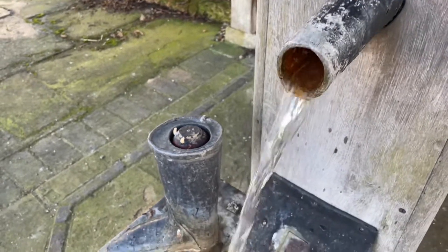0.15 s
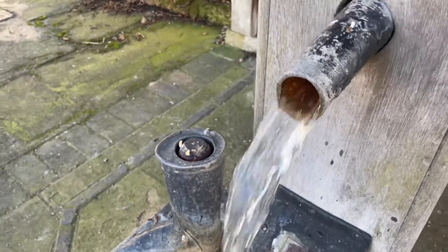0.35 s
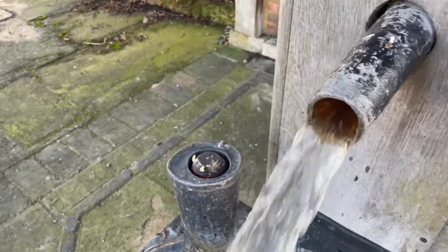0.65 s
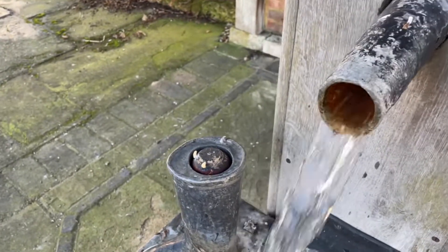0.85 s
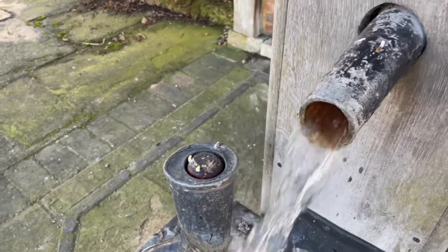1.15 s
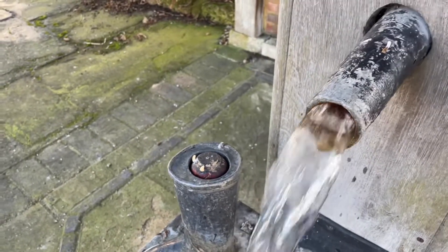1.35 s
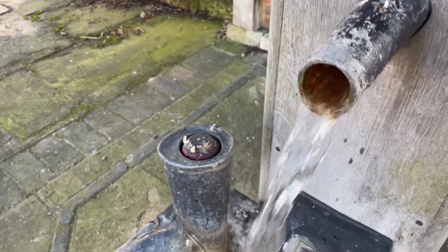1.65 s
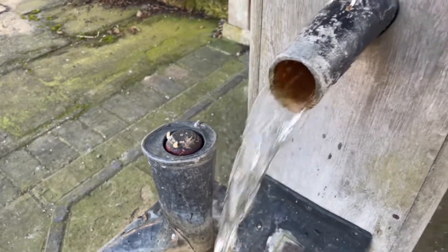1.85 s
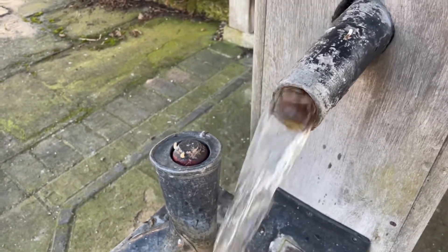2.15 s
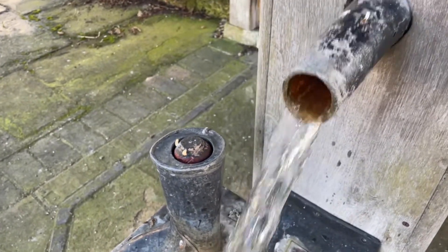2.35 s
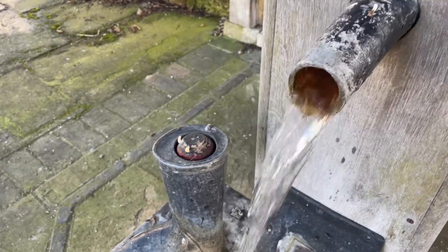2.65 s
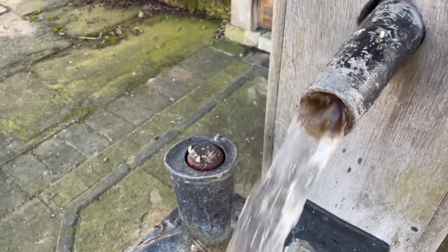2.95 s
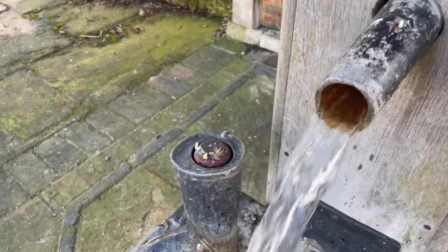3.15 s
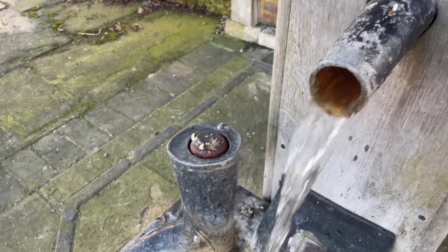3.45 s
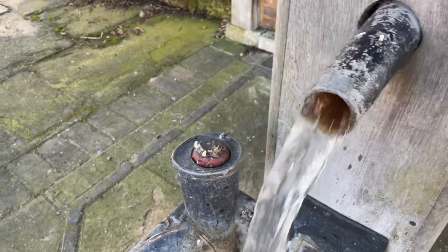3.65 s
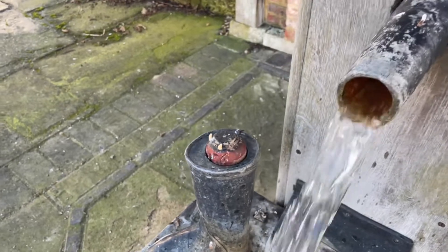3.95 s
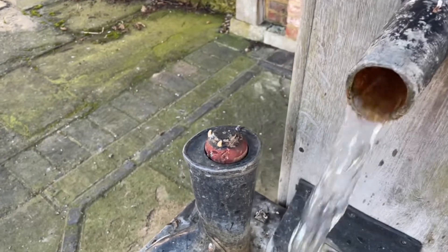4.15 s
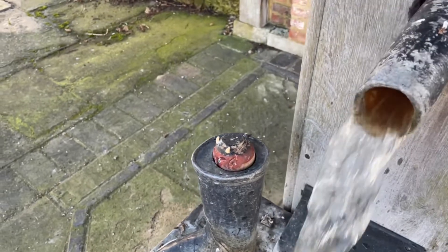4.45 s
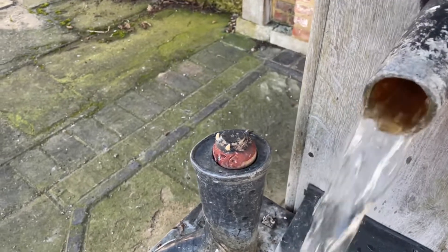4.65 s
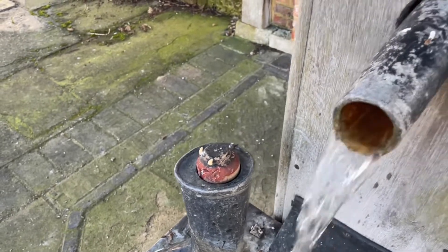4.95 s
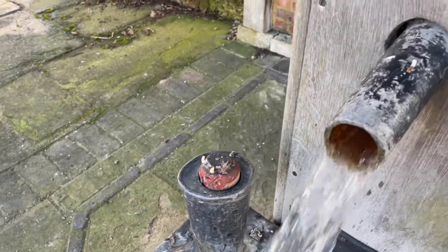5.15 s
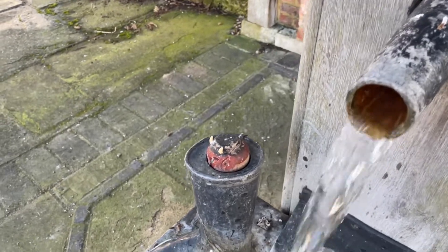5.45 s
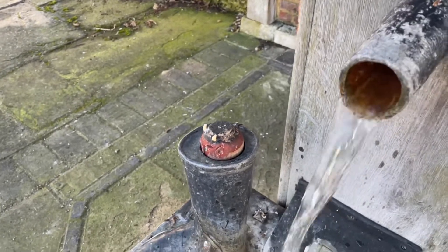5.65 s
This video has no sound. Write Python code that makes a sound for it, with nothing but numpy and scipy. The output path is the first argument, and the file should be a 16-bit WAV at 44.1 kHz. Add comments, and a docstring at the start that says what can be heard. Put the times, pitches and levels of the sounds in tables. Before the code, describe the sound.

Close to the microphone outdoors, an iron pump spout gushes into a trough. About every 0.75 seconds the fizzing jet swells and a heavy slug lands with ringing bubbles and hollow glugs. Between strokes come smaller splashes, plops and stray drops slapping, over a low churn, with very faint thin squeals and a slight short echo off paving.

```python
"""An iron spout gushes into a trough, close to the microphone, as a hand pump is worked outdoors.
Each stroke swells the jet, a fizz of droplets over hiss, and throws a heavy slug: a burst of ringing bubbles
with glugging pockets of air. Between strokes smaller slugs fall, cavities plop open, and the jet breaks and
lands again. Stray drops slap as short spatters, the pool churns low, and the pump squeals thinly."""
import sys
import numpy as np
from scipy import signal
from scipy.fft import rfft, irfft
from scipy.io import wavfile
from scipy.ndimage import uniform_filter1d

SR = 44100
rng = np.random.default_rng(int(sys.argv[2]) if len(sys.argv) > 2 else 0)


def to_wav(s):
    """Save 16-bit WAV."""
    ch = np.atleast_2d(s).T  # columns
    pcm = np.round(np.clip(ch, -1, 1) * 32767)  # PCM
    wavfile.write(sys.argv[1], SR, pcm.astype(np.int16))


N = 255339
TIME = np.arange(N) / SR

# pump strokes, at the moment their main slug lands: start_s, spray_db, spray_ebb_s, splash_length_s,
# splash_db, bubble_pitch_hz, air_pocket_db, deep_glug_db
PUMP_STROKES = [(0.0, -48, 0.45, 0.032, -24, 315, -32, -21.5),
                (0.749, -39.5, 0.15, 0.069, -25.5, 448, -29, -24),
                (1.574, -45, .16, 0.08, -26.5, 406, -21.5, -20.5),
                (2.381, -50.5, 0.43, 0.06, -28, 365, -19.5, -27),
                (3.178, -42.5, 0.16, 0.054, -25, 440, -38, -20),
                (3.929, -43.5, 0.23, .06, -26, 500, -53, -54),
                (4.679, -47, 0.6, 0.063, -26.5, 390, -24, -62),
                (5.412, -42.5, 0.09, 0.072, -25, 444, -28, -24)]
# tone of a dull smack of water: frequency_hz, gain_db
SMACK_SPECTRUM = [(300, -2.5), (1100, -7), (1800, 2), (3000, -4), (7000, -20)]


def gain_of(db):
    """Decibels to amplitude."""
    return 10 ** (np.asarray(db) / 20)


def evened(x):
    """Scales to rms 1."""
    return x / np.sqrt(np.mean(x ** 2) + 1e-20)


def add(mix, s, sound):
    """Lays a sound into the mix at time s."""
    start = max(round(s * SR), 0)
    part = mix[start:][:len(sound)]
    part += sound[:len(part)]


def follow(curve):
    """A curve of (time, value) points at every sample."""
    return np.interp(TIME, *np.transpose(curve))


def coloured(x, spectrum):
    """Filters a sound through a smooth gain curve, then scales it to rms 1."""
    hz, db = np.transpose(spectrum)
    bins_hz = np.fft.rfftfreq(len(x), 1 / SR)
    shape_db = np.interp(np.log(bins_hz + 1), np.log(hz), db)
    return evened(irfft(rfft(x) * gain_of(shape_db), len(x)))


def wander(hz):
    """Slow chance of rms 1 that changes about hz times a second."""
    knots = np.random.default_rng(rng.integers(1 << 30)).standard_normal(8192)
    return evened(np.interp(TIME * hz, np.arange(len(knots)), knots))


def scattered(x, t60):
    """Hard surfaces scatter a sound into a short, sparse tail of about the same energy."""
    t = np.arange(0, t60, 1 / SR)
    present = rng.random(SR)[:len(t)] < 3000 / SR  # about 3000 echoes a second
    taps = rng.standard_normal(SR)[:len(t)] * present * gain_of(-60 * t / t60)
    return signal.oaconvolve(x, taps / np.linalg.norm(taps))[:N]


def bubble(t, hz, cycles, glide):
    """A bubble rings for a few cycles, its pitch sliding as it nears the surface."""
    turns = hz * np.maximum(t, 0)
    age = turns / cycles
    phase = 2 * np.pi * turns * (1 + glide * np.minimum(age, 6) / 2)
    return np.sin(phase) * np.exp(-age) * (1 - np.exp(-turns / 0.1))


def swarm(low_hz, high_hz, per_s, cycles, spread_db, glide, count, patchy_db=0):
    """Bubbles of many drifting sizes born at random; a few are much louder, and each size has its own echoes."""
    out = np.zeros(N)
    for hz in np.geomspace(low_hz, high_hz, count):
        loudness_db = spread_db * np.minimum(rng.exponential(1, 4000), 3.5)
        sizes = gain_of(loudness_db) * rng.choice([-1, 1], 4000)
        places = rng.integers(0, N, len(sizes))
        born = int(per_s * N / SR / count)
        births = np.bincount(places[:born], sizes[:born], N)
        ring = bubble(np.arange(0, 6 * cycles / hz, 1 / SR), hz, cycles, glide)
        direct = signal.oaconvolve(births, ring)[:N]
        stream = direct + .8 * scattered(direct, t60=0.026)
        if hz < 10500:
            # reading at an uneven speed makes the pitch drift
            drift = np.cumsum(1 + .07 * wander(14))
            stream = np.interp(drift % N, np.arange(N), stream)
        out += np.sqrt(hz) * evened(stream * gain_of(patchy_db * wander(50)))
    return evened(out)


def trough(flow_db):
    """The jet stirs the pool: a deep, lumpy churn and a gurgle of middling bubbles."""
    # tone of the deep churn: frequency_hz, gain_db
    churn_spectrum = [(20, -48), (35, -15), (55, -4), (80, -1.5), (125, 0), (200, -7), (450, -18),
                      (1000, -34), (3000, -75)]
    # tone of the middling bubbles: frequency_hz, gain_db
    gurgle_spectrum = [(120, -25), (270, 10), (500, -8.5), (780, 4), (1100, -18), (2200, -49), (6000, -53)]
    # churn in the pool, before its lumps: time_s, level_db
    churn_level = [(0, -38), (.6, -45), (.95, -37), (1.42, -53), (1.8, -34.5), (2.35, -35), (2.75, -32.5),
                   (2.96, -37), (3.1, -34), (3.5, -29), (3.72, -35), (4.2, -32.5), (4.55, -40),
                   (4.85, -38.5), (5.0, -35.5), (5.33, -44), (5.55, -37.5), (5.79, -38)]
    gurgle_db, gurgle_follows = -27, 0.34  # the gurgle follows only this share of the jet's dB

    lumps_db = 3 * wander(32)
    deep = swarm(45, 420, per_s=260, cycles=1.1, spread_db=1.8, glide=0, count=10)
    churn = coloured(deep, churn_spectrum) * gain_of(follow(churn_level) + lumps_db)
    middling = swarm(240.3, 1504, per_s=420, cycles=4.3, spread_db=1.5, glide=0.019, count=20)
    gurgle = coloured(middling, gurgle_spectrum) * gain_of(gurgle_db + gurgle_follows * flow_db)
    return churn + gurgle


def squeal():
    """A thin wavering whistle from the pump, each squeal swelling and fading in a half-sine arch."""
    # squeals of the pump: start_s, length_s, peak_db
    squeals = [(.435, 0.065, -56), (.77, .07, -51), (3.21, 0.098, -55), (5.11, .07, -63),
               (5.413, 0.12, -49)]
    level = np.zeros(N)
    for s, length, db in squeals:
        level += gain_of(db) * np.sin(np.pi * np.clip((TIME - s) / length, 0, 1))
    pitch = 14870 + 110 * wander(600)
    return level * np.sin(2 * np.pi * np.cumsum(pitch) / SR)


def spatter(low_hz, high_hz, fade_s, count):
    """A tight cluster of droplets, each with its own pitch, thinning and fading."""
    t = np.arange(0, .05, 1 / SR)
    pitch = np.geomspace(low_hz, high_hz, count) * np.exp(.1 * rng.standard_normal(count))
    born = 3 * fade_s * ((rng.permutation(count) + rng.random(count)) / count) ** 1.5
    sizes = np.sqrt(pitch) * np.exp(-.7 * born / fade_s) * rng.choice([-1, 1], count)
    rings = bubble(t - born[:, None], pitch[:, None], 1.5, glide=0)
    return sizes * np.sqrt(pitch) @ rings


def burst(spectrum, fade_s, count):
    """A spatter with a given tone, as strong as a unit noise with that fade, so louder the longer it lasts."""
    sound = coloured(spatter(spectrum[0][0], spectrum[-1][0], fade_s, count), spectrum)
    onset = 1 - np.exp(-TIME[:len(sound)] / .0005)
    return sound * onset * np.sqrt(fade_s * SR / 2 / len(sound))


def slap(db, smack_db):
    """A drop bursts in a sharp spatter, with a duller smack under it."""
    # tone of the sharp spatter: frequency_hz, gain_db
    slap_spectrum = [(200, -25), (1200, -7), (2500, -28), (5000, 2.5), (9000, 3), (16000, -1)]
    sharp = burst(slap_spectrum, fade_s=0.0041, count=140)
    smack = gain_of(smack_db) * burst(SMACK_SPECTRUM, fade_s=.0062, count=40)
    return gain_of(db - 6.8) * (sharp + smack)


def add_stray_drops(water):
    """Stray drops slap on iron and stone, each bursting on impact."""
    # drops: start_s, nominal level_db, smack_db (relative to the sharp spatter)
    stray_drops = [(.009, -26, -13), (0.208, -25, -10), (0.263, -29.5, -3), (0.329, -25, -17),
                   (0.341, -23.5, 3), (0.6584, -22.5, 4), (.673, -26, -2), (.691, -26, -5), (.998, -28, 4),
                   (1.068, -28.5, 7), (1.4326, -30.5, 4.5), (1.51, -25.5, 1), (1.642, -30, -5),
                   (1.668, -24, 0), (1.745, -25, -18), (1.79, -29, 0), (1.8255, -34, 14),
                   (1.879, -25.5, -0.5), (2.132, -30.5, -2), (2.24, -27, -10), (2.344, -32.5, 8.5),
                   (2.362, -32, -9), (2.556, -21.5, -14), (2.572, -27.5, 1.5), (2.665, -26.5, -0.5),
                   (2.874, -32, -7), (3.282, -26, 0), (3.383, -28, 4.5), (3.475, -28, 0), (3.785, -29.5, 0),
                   (3.825, -32, 3), (3.997, -29, -5), (4.236, -29, 6), (4.2683, -25, -3), (4.348, -27.5, 0),
                   (4.444, -35.5, 11.5), (4.645, -24.5, -1), (4.916, -29, 2), (5.067, -24, -1),
                   (5.401, -20, -1), (5.419, -21.5, 5), (5.572, -27.5, -4), (5.7413, -24, -5)]
    for s, db, smack_db in stray_drops:
        add(water, s, slap(db, smack_db))


def plink(db, hz):
    """A small bubble rings up and away, its pitch climbing as it nears the surface."""
    age = np.arange(0, 8, 1 / (SR * PLINK_SWELL_S))
    pitch = hz * (1 + 0.023 * (age - 1))  # share climbed per swell time
    level = gain_of(db) * (age * np.exp(1 - age)) ** 3.3
    return level * np.sin(2 * np.pi * (np.cumsum(pitch) / SR + rng.random()))


PLINK_SWELL_S = 0.0025


def glug(db, hz, swell):
    """A big pocket of air swells into ringing and sinks in pitch as it widens."""
    age = np.arange(0, 8, 1 / (SR * swell))
    pitch = hz * (0.874 + 0.16 * np.exp(-age / 2.37))
    level = gain_of(db) * age ** 2.85 * np.exp(2.97 * (1 - age))
    return level * np.sin(2 * np.pi * (np.cumsum(pitch) / SR + rng.random()))


def ringing_bubbles():
    """Single bubbles that stand out of the water; the larger a gulp is, the slower it swells."""
    # large air bubbles that ring out from the splashes: loudest_s, pitch_hz, peak_db
    gulps = [(.01, 245, -23), (.034, 205, -23), (.147, 151, -34), (0.44, 300, -18), (0.476, 230, -18.5),
             (.488, 129, -22.5), (.764, 370, -18.5), (0.775, 630, -20), (0.821, 250, -18), (.994, 482, -18),
             (1.083, 890, -15), (1.248, 477, -16.5), (1.587, 370, -17.5), (1.624, 450, -20),
             (1.962, 916, -18), (1.975, 216, -24), (2.003, 315, -21.5), (2.124, 780, -24.5),
             (2.429, 262, -16), (2.83, 670, -19), (2.841, 320, -22.5), (3.19, 350, -19.5),
             (3.213, 543, -17), (3.545, 854, -18), (3.641, 546, -25.5), (3.656, 252, -20), (3.97, 324, -22),
             (4.705, 330, -27), (4.424, 328, -22), (4.449, 900, -18), (5.154, 900, -18),
             (5.459, 460, -16.5), (5.471, 269, -24), (5.634, 470, -18.5), (5.666, 400, -24)]
    # small bubbles that plink above the spray: loudest_s, pitch_hz, peak_db
    plinks = [(.053, 3010, -28.5), (.154, 2310, -31.5), (.343, 1240, -26), (0.551, 1150, -31.5),
              (0.661, 1680, -30), (.761, 2530, -25.5), (1.676, 1190, -27), (1.747, 2980, -34),
              (1.834, 2380, -32), (2.574, 1960, -28), (3.147, 2540, -27), (3.384, 1460, -31),
              (3.427, 1750, -28.5), (3.661, 4070, -35), (3.788, 3710, -29), (3.83, 2010, -30.5),
              (4.205, 1710, -31.5), (4.6, 1600, -25.5), (4.895, 1712, -31), (5.152, 2540, -26),
              (5.657, 1660, -25.5), (5.745, 2000, -28.5)]
    out = np.zeros(N)
    for s, hz, db in gulps:
        swell = 0.00496 * np.sqrt(400 / hz)  # seconds; 0.00496 at 400 Hz
        add(out, s - swell, glug(db, hz, swell))
    for s, hz, db in plinks:
        add(out, s - PLINK_SWELL_S, plink(db, hz))
    return out


def splash(length, db, hz, count=64):
    """A slug of water drags down a burst of bubbles; larger ones dominate late, and a few straggle."""
    pitch = np.geomspace(140, 3200, count)
    octaves = np.log2(pitch / hz)
    # golden-ratio steps spread the sizes evenly over the splash
    order = (np.arange(count) * (np.sqrt(5) - 1) / 2 + rng.random() + .15 * rng.random(count)) % 1
    straggle = order ** 6
    born = length * (order + 0.5 * straggle) + .4 / pitch
    colour_db = -np.where(octaves > 0, 5.6, -4.8) * octaves
    chance_db = 2.56 * rng.standard_normal(count)
    size_db = colour_db + chance_db - 3 * order - 6 * straggle - 2.85 * order * octaves
    t = np.arange(0, 1.6 * length + .06, 1 / SR)
    cycles = 3.2 * (pitch[:, None] / 500) ** .3  # small bubbles ring for more cycles
    rings = bubble(t - born[:, None], pitch[:, None], cycles, glide=-0.041)
    bubbles = (gain_of(size_db) * rng.choice([-1, 1], count)) @ rings
    return gain_of(db) * bubbles / np.sqrt(np.sum(bubbles ** 2) / (SR * (length + 0.0068)))


def frothy(length, db, hz, count=5):
    """A heavy splash whips up a longer froth of smaller bubbles in its wake and a few late plinks."""
    froth_delay_s, froth_hz, froth_db, froth_lasts = .009, 880, -16, 1.2  # dB over the splash, times its length
    after_db, after_s = -19.5, 0.094  # late plinks: peak dB over the splash, how long they keep coming
    out = np.zeros(SR // 2)
    add(out, 0, splash(length, db, hz))
    add(out, froth_delay_s, splash(froth_lasts * length, db + froth_db, froth_hz))
    for late, size in rng.random((count, 2)):
        add(out, length + late * after_s, plink(db + after_db - 6 * late, 750 * 2.82 ** size))
    return out


def plop(db, hz, halving, count=24):
    """An air cavity tears open in a ragged run of ever larger bubbles; its rim spits droplets."""
    tear_s = 0.00911  # how long a cavity takes to tear open
    t = np.arange(0, .06, 1 / SR)
    born = tear_s * ((np.arange(count) + rng.random(count)) / count) ** 1.6
    pitch = hz / (1 + born / halving) * np.exp(.25 * rng.standard_normal(count))
    rings = bubble(t - born[:, None], pitch[:, None], 2.8, glide=-.02)
    sizes = np.exp(-born / 0.035) * rng.choice([-1, 1], count)
    run = .24 * evened(sizes @ rings)
    add(run, 0, gain_of(-3.5) * burst(SMACK_SPECTRUM, fade_s=0.0036, count=56))
    return gain_of(db) * run * (1 - np.exp(-t / .0013))


def plunges():
    """Every slug splashes and traps air; every cavity plops, fills with a splash and glugs."""
    # smaller slugs between the strokes: start_s, splash_length_s, splash_db, bubble_pitch_hz,
    # air_pocket_peak_db, air_pocket_swell_s
    small_slugs = [(0.133, 0.021, -29, 187, -42, 0.0078), (0.219, 0.046, -33.5, 373, -32.5, 0.01),
                   (0.873, 0.084, -35, 497, -37, 0.01), (0.98, 0.062, -26.5, 437, -35, 0.018),
                   (1.793, 0.062, -27.5, 470, -18, 0.0039), (2.34, .042, -28.5, 440, -24.5, 0.017),
                   (2.629, 0.036, -30.5, 494, -21, 0.0082), (2.671, 0.032, -30, 593, -49, 0.015),
                   (2.811, 0.022, -30, 614, -42, 0.008), (1.764, .02, -35, 322, -24, 0.0053),
                   (4.96, .012, -35, 266, -37, 0.011), (5.675, .04, -37, 417, -38, .007),
                   (3.256, 0.095, -36.5, 298, -33, 0.0076), (3.385, 0.063, -31.5, 437, -17.5, 0.0043),
                   (3.632, 0.037, -27.5, 347, -23, 0.0098), (4.059, 0.057, -48, 340, -29, 0.009),
                   (4.14, 0.012, -31.5, 496, -19, 0.0096), (4.202, 0.038, -30, 370, -28, 0.013),
                   (4.854, 0.017, -31, 459, -18.5, 0.0059), (4.886, 0.052, -29, 446, -21, 0.0032),
                   (5.113, 0.035, -24.5, 566, -37, 0.0015), (5.612, 0.028, -27.5, 488, -21, 0.0063)]
    # cavities bursting open and filling in: start_s, plop_db, starting_pitch_hz, pitch_halving_s,
    # splash_length_s, splash_db, splash_pitch_hz, deep_glug_db
    cavities = [(0.432, -19, 2650, 0.0019, 0.053, -25.5, 654, -24),
                (1.077, -17.5, 3150, 0.0023, 0.028, -29.5, 760, -23.5),
                (1.241, -19.5, 2840, 0.0048, 0.03, -27, 543, -47),
                (1.576, -21.5, 1490, 0.0017, 0.017, -32, 450, -37),
                (1.955, -18.5, 2360, 0.0025, 0.034, -25.5, 516, -17),
                (2.12, -27, 1014, 0.0043, 0.027, -64, 725, -47),
                (2.823, -18, 3030, 0.0041, 0.036, -26.5, 714, -28),
                (3.422, -31, 1880, 0.0048, 0.022, -28, 540, -30),
                (3.538, -21, 1900, 0.0021, .028, -26, 720, -27),
                (4.413, -18.5, 1470, 0.0021, 0.051, -25.5, 550, -18.5),
                (5.148, -20, 2000, 0.0016, 0.031, -27.5, 620, -20),
                (5.651, -22.5, 1850, 0.0015, 0.062, -31.5, 520, -33)]
    slug_rise_s = .007  # a heavy slug sinks in gradually
    # smaller pocket of a stroke: pitch ratio to the splash, share of the splash gone by, swell
    pocket_pitch, pocket_at, pocket_swell_s = 0.83, 0.1288, 0.014
    deep_hz, deep_swell = 151, 0.41  # deep glug of a stroke: swells for this share of the splash
    fill_delay_s = 0.002994  # a splash fills the cavity just after its plop
    # then the hollow below rings: pitch, swell, share of the splash gone by
    hollow_hz, hollow_swell_s, hollow_at = 118, .0105, .45

    out = np.zeros(N)
    slug_rise = 1 - np.exp(-TIME[:SR // 2] / slug_rise_s)
    for s, _, _, length, db, hz, pocket_db, deep_db in PUMP_STROKES:
        add(out, s, frothy(length, db, hz) * slug_rise)
        add(out, s + pocket_at * length, glug(pocket_db, pocket_pitch * hz, pocket_swell_s))
        add(out, s, glug(deep_db, deep_hz, deep_swell * length))
    for s, length, db, hz, pocket_db, swell in small_slugs:
        add(out, s, splash(length, db, hz))
        add(out, s, glug(pocket_db, hz, swell))
    for s, plop_db, plop_hz, halving, length, db, hz, deep_db in cavities:
        add(out, s, plop(plop_db, plop_hz, halving))
        add(out, s + fill_delay_s, frothy(length, db, hz))
        add(out, s + hollow_at * length, glug(deep_db, hollow_hz, hollow_swell_s))
    return out


def jet_db():
    """Strength of the falling jet: a swell and ebb for each stroke, a dip and a surge for each break."""
    # the jet breaks, then the held-back water lands at once: landing_s, gap_before_s,
    # surge_db (before the edges are smoothed)
    breaks = [(0.33, 0.023, -6), (0.403, 0.027, 7), (.645, 0.042, -10), (1.061, 0.021, 6),
              (1.238, 0.073, 20), (1.428, 0.02, 12), (1.949, 0.014, 14), (2.11, 0.034, 4),
              (2.203, 0.0049, 19.5), (2.557, 0.029, 4), (2.752, 0.048, 20.5), (2.95, 0.032, 4),
              (3.533, 0.038, 4), (3.642, 0.0084, 19), (3.765, 0.03, 9), (3.922, 0.0031, 14.5),
              (4.07, 0.0049, 14.5), (4.341, 0.063, 18), (4.586, 0.07, 14), (5.066, 0.042, 4),
              (5.303, 0.056, 1), (5.395, 0.042, 4)]
    swell_s, trickle_db = 0.087, -50.5  # rise before each slug; level the jet ebbs down to
    gap_db, gap_edge_s, surge_s = -8.5, 0.019, 0.02  # dip before smoothing, smoothing time, surge fade

    flow = np.full(N, gain_of(trickle_db))
    for s, db, ebb, *_ in PUMP_STROKES:
        flow += gain_of(db) * np.exp(-np.maximum((s - TIME) / swell_s, (TIME - s) / ebb))
    broken_db = np.zeros(N)
    for s, gap, surge_db in breaks:
        add(broken_db, s - gap, np.full(round(gap * SR), gap_db))
        add(broken_db, s, surge_db * np.exp(-TIME[:SR // 2] / surge_s))
    return 20 * np.log10(flow) + uniform_filter1d(broken_db, max(round(gap_edge_s * SR), 1))


def spray(flow_db):
    """Droplets patter over a fine hiss, each size in its own clumps, and leave small bubbles tinkling."""
    # tone of the fizzing jet: frequency_hz, gain_db
    spray_spectrum = [(600, 16.5), (1400, 6), (2200, 9), (3200, 1.5), (4700, 2), (6500, -0.5), (9000, -0.5),
                      (12000, -5.5), (16000, -10)]
    # tone of the small bubbles: frequency_hz, gain_db
    tinkle_spectrum = [(600, -72), (1100, -2), (1700, -4), (2300, -3), (3400, -8), (5000, -10.5),
                       (10000, -3)]
    # tone of the stray droplets: frequency_hz, gain_db
    stray_spectrum = [(1000, 4), (2200, 3), (5000, -5.5), (16000, -1.5)]
    patchy_db = 2  # clumping of each droplet size on its own
    tinkle_db = 1  # small bubbles over the spray
    stray_db = -56.5  # droplets that keep falling while the jet is broken

    # slow and quick clumping of the whole spray
    clumps_db = 2.62 * wander(60) + 1.5 * wander(280)
    crackle = swarm(3420, 15500, per_s=2600, cycles=1.3, spread_db=5.8, glide=0, count=10, patchy_db=patchy_db)
    droplets = swarm(2500, 14000, per_s=3800, cycles=3.6, spread_db=4.1, glide=.01, count=24, patchy_db=patchy_db)
    hiss = gain_of(-4.5) * rng.standard_normal(N)
    fizz = gain_of(2) * crackle + droplets + hiss
    small = swarm(1000, 5200, per_s=1300, cycles=5.5, spread_db=4.1, glide=.025, count=30, patchy_db=patchy_db)
    strays = swarm(1500, 14000, per_s=800, cycles=3, spread_db=4, glide=.02, count=12, patchy_db=patchy_db)
    tinkle_level_db = flow_db + tinkle_db + .5 * clumps_db + 1.3 * wander(35)
    jet = coloured(fizz, spray_spectrum) * gain_of(flow_db + clumps_db)
    tinkle = coloured(small, tinkle_spectrum) * gain_of(tinkle_level_db)
    return jet + tinkle + gain_of(stray_db) * coloured(strays, stray_spectrum)


def scene():
    """All the water and the pump, close to the microphone, with a little echo off the paving."""
    flow_db = jet_db()
    water = spray(flow_db) + trough(flow_db) + plunges() + ringing_bubbles() + squeal()
    add_stray_drops(water)
    echo = gain_of(-13.0) * scattered(water, t60=0.11)
    return (water + echo)[None]


def record(dry):
    """The microphone drops the lowest bass and rounds off the loudest peaks; then the treble is cut off."""
    low_cut = signal.butter(2, 28, "highpass", fs=SR, output="sos")
    dry = signal.sosfilt(low_cut, dry)
    ceiling = gain_of(-11.5)
    rounded = dry / (1 + (dry / ceiling) ** 6) ** (1 / 6)
    band_limit = signal.firwin(511, 16050, window=("kaiser", 9), fs=SR)  # low-pass edge in Hz
    return signal.oaconvolve(rounded, band_limit[None], "same")


dry = scene()
out = record(dry)
to_wav(out)
```